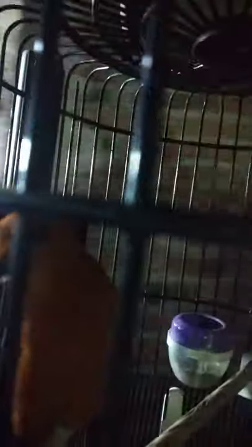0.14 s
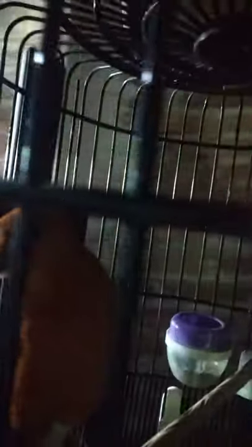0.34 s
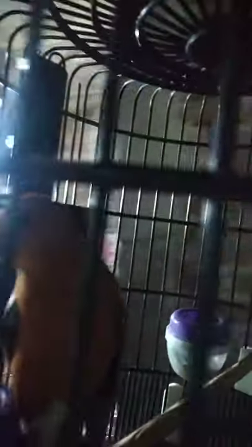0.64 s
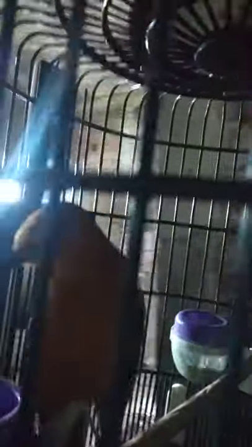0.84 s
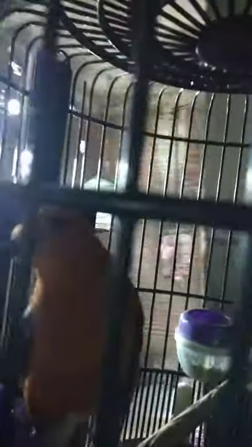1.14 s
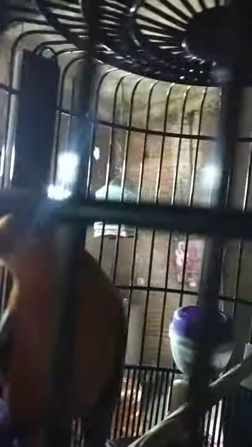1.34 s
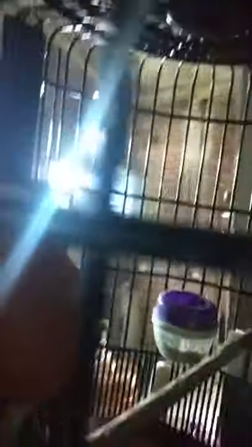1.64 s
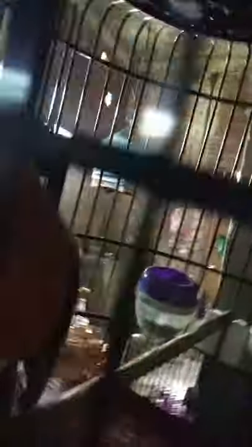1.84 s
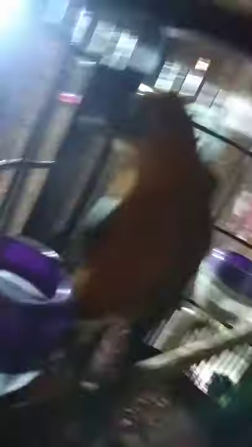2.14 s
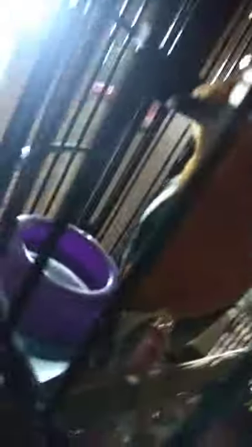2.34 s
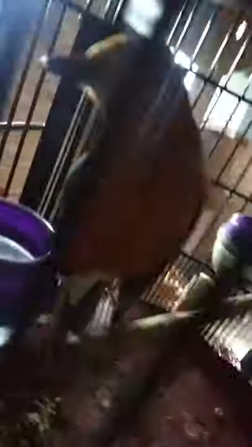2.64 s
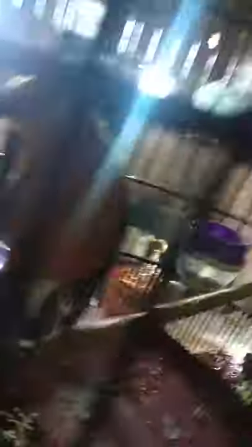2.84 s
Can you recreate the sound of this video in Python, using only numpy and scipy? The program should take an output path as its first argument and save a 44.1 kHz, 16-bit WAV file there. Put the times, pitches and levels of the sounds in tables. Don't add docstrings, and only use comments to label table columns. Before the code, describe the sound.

Short high chips from one bird repeat, a distant bird whistles faintly, then a near caged songbird warbles and glides downward; fingers tick and bump the phone casing amid room hum and microphone hiss.

```python
import sys
import numpy as np
from scipy import signal
from scipy.fft import rfft, irfft
from scipy.io import wavfile
from scipy.ndimage import uniform_filter1d

SR = 44100
rng = np.random.default_rng(int(sys.argv[2]) if len(sys.argv) > 2 else 0)


def waveform_to_disk(signal):
    frames = np.transpose(np.atleast_2d(signal))
    scaled = np.clip(frames, -1, 1) * 32767
    samples = np.round(scaled).astype(np.int16)
    wavfile.write(sys.argv[1], SR, samples)


def field_ratio(decibels):
    return 10 ** (np.asarray(decibels, dtype=float) / 20)


N = 132300
LEAD_IN = SR // 2


def evened(x):
    return x / np.sqrt(np.mean(x ** 2) + 1e-20)


def read(points, hz):
    f, value = np.transpose(points)
    return np.interp(np.log(hz + 1), np.log(f + 1), value)


def wander(shape, size):
    return evened(uniform_filter1d(rng.standard_normal(shape), size=size))


def add(mix, s, sound, pan_db, lag):
    for side, sign in enumerate((1, -1)):
        part = mix[side, LEAD_IN + round(s * SR) + sign * lag // 2:][:len(sound)]
        part += field_ratio(sign * pan_db / 2) * sound[:len(part)]


def coloured(shape, points):
    z = rfft(rng.standard_normal(shape))
    gain = field_ratio(read(points, np.fft.rfftfreq(shape[-1], 1 / SR)))
    return evened(irfft(z * gain, shape[-1]))


def tone_bump(hz, db, width):
    t = np.arange(-.03, .03, 1 / SR) if width < .01 else np.arange(-.04, .04, 1 / SR)
    return t[0], field_ratio(db) * np.exp(-(t / width) ** 2) * np.sin(2 * np.pi * hz * t)


def whistle(rows, overtones_db, breath_db):
    # start and end in seconds, depth in Hz.
    trills = [
        (1.05, 1.19, 230),
        (1.455, 1.6, 75),
        (1.64, 1.79, 80),
        (2.96, 3.1, 150),
    ]
    overtone_levels = [-32, -26.5, -22, -21.5, -30]
    # frequency in Hz, gain in dB.
    overtone_colour = [(4000, 9), (6000, -23.5), (8000, -13), (10500, -2), (13000, -13.5), (16000, -38)]
    # frequency in Hz, level in dB per Hz.
    breath_colour = [(3000, -13), (4300, 6), (5500, 6.5), (7000, 7), (11000, 0.5), (13500, -6),
                     (16000, -20)]
    waver, waver_hz = .005, 60
    trill_hz, trill_jitter = 137.2, 0.4
    fuzz, fuzz_hz = .5, 130

    s, hz, db = np.transpose(rows)
    t = np.arange(s.min(), s.max(), 1 / SR)
    drift = wander(30000, int(SR / waver_hz))[:len(t)]
    f = uniform_filter1d(np.interp(t, s, hz), 400, mode="nearest") * (1 + waver * drift)
    depth_hz = sum(depth * (t > start) * (t < end) for start, end, depth in trills)
    depth_hz = uniform_filter1d(depth_hz, 800, mode="nearest")
    f = f + depth_hz * np.sin(2 * np.pi * np.cumsum(trill_hz * (1 + trill_jitter * drift)) / SR)
    turn = 2 * np.pi * np.cumsum(f) / SR

    a, b = wander((2, 5, 30000), int(SR / fuzz_hz))[..., :len(t)]
    tone = np.sin(turn)
    for k, overtone_db in enumerate(overtone_levels, start=2):
        level = field_ratio(overtone_db + overtones_db + read(overtone_colour, k * f)) * (k * f < 17000)
        steady = ((1 - fuzz) + fuzz * a[k - 2]) * np.sin(k * turn)
        tone = tone + level * (steady + fuzz * b[k - 2] * np.cos(k * turn))
    breath = coloured((30000,), breath_colour)[:len(t)] * (0.21 + depth_hz / 150) * (1 + .8 * a[0])
    ends = np.clip(np.minimum(t - t[0], t[-1] - t) / .004, 0, 1)
    effort = field_ratio(uniform_filter1d(np.interp(t, s, db), 200, mode="nearest"))
    return ends * effort * (np.sqrt(2) * tone + field_ratio(breath_db) * breath)


def singer():
    # time in seconds, pitch in Hz, level in dB.
    warble = [
        [(1.052, 2226, -51), (1.066, 2377, -44.5), (1.1, 2545, -35.5), (1.135, 3288, -32.5), (1.165, 3122, -32),
         (1.21, 2623, -24.5), (1.25, 2581, -32.5), (1.35, 2538, -34.5), (1.43, 2648, -51)],
        [(1.455, 2552, -39), (1.485, 2448, -33.5), (1.525, 2288, -36.5), (1.56, 2016, -46.5),
         (1.585, 1950, -58)],
        [(1.65, 2363, -30.5), (1.67, 2528, -40), (1.695, 2360, -35.5), (1.725, 2074, -37.5), (1.77, 2016, -44),
         (1.795, 2452, -32), (1.835, 2476, -31.5), (1.865, 2407, -47.5), (1.88, 2354, -45.5)],
    ]
    # time in seconds, pitch in Hz, level in dB.
    whistles = [
        [(2.0, 5160, -117), (2.02, 5156, -32.5), (2.048, 4790, -33), (2.075, 4325, -27.5), (2.105, 4283, -36.5),
         (2.18, 4108, -29), (2.25, 3960, -36), (2.31, 3800, -69), (2.335, 3610, -56)],
        [(2.34, 3520, -77), (2.362, 3465, -30), (2.384, 3245, -29), (2.44, 3182, -33.5), (2.48, 3136, -46),
         (2.495, 3180, -71)],
        [(2.52, 3450, -70), (2.53, 3278, -22.5), (2.56, 3257, -33.5), (2.6, 3187, -29), (2.64, 3143, -36.5),
         (2.66, 3390, -82)],
        [(2.706, 2218, -48), (2.726, 2330, -39), (2.775, 2300, -40), (2.815, 2310, -28), (2.84, 2314, -24),
         (2.87, 2300, -45), (2.89, 2300, -66)],
        [(2.96, 2800, -53), (2.98, 3058, -35), (3.02, 3330, -16)],
    ]
    # overtones in dB, breath noise in dB, left over right in dB.
    voice = [(4, -20, 0), (9, -47, 0), (10, -47, 1), (26.5, -19.5, 0), (3, -18, -1.5), (0.5, -20.5, 2.5),
             (-2, -20.5, 6), (-8, -55, 1.5)]
    song = np.zeros((2, N + LEAD_IN))
    for rows, (overtones_db, breath_db, pan_db) in zip(warble + whistles, voice):
        add(song, rows[0][0], whistle(rows, overtones_db, breath_db), pan_db, lag=7)
    return song


def chip(db, dip_hz, end_hz, end_db):
    top_hz, lead_db = 6250, -30
    lead_s, fall_s, dip_s, rise_s, end_s, stop_s = .004, .005, .003, .003, .012, .003
    at = np.cumsum([0, lead_s, fall_s, dip_s, rise_s, end_s, stop_s])
    t = np.arange(0, at[-1], 1 / SR)
    wobble = wander(4000, 120)[:len(t)]
    f = np.interp(t, at, [top_hz, top_hz, dip_hz, dip_hz, end_hz, end_hz, end_hz]) * (1 + .012 * wobble)
    level = field_ratio(db + np.interp(t, at, [lead_db, lead_db + 16.5, 0, 0, end_db, end_db, -40]))
    rasp = wander(4000, 40)[:len(t)]
    level = level * (1 + .03 * rasp)
    snap = rng.standard_normal(4000)[:len(t)] * np.exp(-((t - at[3]) / 0.0019) ** 2)
    tone = np.sin(2 * np.pi * np.cumsum(f) / SR)
    return level * np.minimum(t / 0.00067, 1) * (tone + field_ratio(-24) * snap)


def chipping_bird():
    # start in seconds, level in dB, dip in Hz, end pitch in Hz, end level in dB.
    chip_rows = [(-.17, -30, 5350, 6010, -5), (0.226, -21.5, 5335, 5950, -5.5),
                 (0.676, -26, 5516, 6067, 0.5), (1.071, -27.5, 5283, 6055, 0),
                 (1.466, -28.5, 5530, 6077, 1), (1.851, -26.5, 5566, 6100, -5),
                 (2.249, -30, 5600, 6140, 1.5), (2.571, -28, 5590, 6150, -3.5),
                 (2.835, -30, 5845, 6195, -4)]
    # time in seconds, left over right in dB.
    phone_turn = [(1.1, 3.5), (1.5, 0.5), (2.9, -5)]
    # middle in seconds, pitch in Hz, level in dB, width in seconds.
    pip_s, pip_hz, pip_db, pip_width = (.826, 1550, -56, .005)
    chips = np.zeros((2, N + LEAD_IN))
    for s, *shape in chip_rows:
        add(chips, s, chip(*shape), np.interp(s, *np.transpose(phone_turn)), lag=-3)
    lead, sound = tone_bump(pip_hz, pip_db, pip_width)
    add(chips, pip_s + lead, sound, 0.3, 0)
    return chips


def far_bird():
    # time in seconds, pitch in Hz, level in dB.
    far_rise = [(.495, 2300, -66), (.57, 2800, -56), (.61, 3110, -51), (.63, 3150, -48), (.668, 3160, -52),
                (.685, 3250, -68), (.71, 3350, -58), (.74, 3450, -70)]
    # time in seconds, pitch in Hz, level in dB.
    far_fall = [(1.555, 3350, -68), (1.575, 3300, -60), (1.6, 3260, -61), (1.625, 3180, -70)]
    far = np.zeros((2, N + LEAD_IN))
    add(far, far_rise[0][0], whistle(far_rise, -24, -40), 0.3, 0)
    add(far, far_fall[0][0], whistle(far_fall, -15, -34), 0.3, 0)
    return far


def room(x, shorten):
    # frequency in Hz, time to fall by 60 dB in seconds.
    decay = [(2500, 0.29), (6000, 0.54), (10000, 0.31)]
    first_echo_s, shared, drift_hz = 0.0056, 0.067, 1.8
    at = np.arange(round(first_echo_s * SR), SR - 40, 20)
    at = at + rng.integers(0, 20, (3, 3, len(at)))
    taps = np.zeros((3, 3, SR))
    np.put_along_axis(taps, at, rng.choice([-1., 1.], at.shape), 2)
    pair = shared * taps[:, 2:] + np.sqrt(1 - shared ** 2) * taps[:, :2]
    hz, t, z = signal.stft(pair, SR, nperseg=256)
    t60 = shorten * read(decay, hz)[:, None]
    tail = signal.istft(z * field_ratio(-60 * t / t60) / np.sqrt(t60), SR, nperseg=256)[1]
    tail = tail / np.linalg.norm(tail[0, 0])
    wet = signal.fftconvolve(x[None], tail, axes=2)[..., :x.shape[1]]
    turn = 2 * np.pi * (drift_hz * np.arange(x.shape[1]) / SR + np.arange(3)[:, None, None] / 3)
    return (np.sqrt(2 / 3) * np.cos(turn) * wet).sum(0)


def birds():
    song, chips, far = singer(), chipping_bird(), far_bird()
    song_wet = room(field_ratio(6.5) * song + far, shorten=0.8)
    chips_wet = room(field_ratio(2) * chips, shorten=1)
    return field_ratio(-6) * song + field_ratio(3) * chips + .5 * far + song_wet + chips_wet


def ticks(out):
    tick_starts = [
        1.95666,
        2.0148,
        2.9985,
    ]
    # peak in dB, ring in Hz, time to fall by 60 dB in seconds, left over right in dB.
    tick_rows = [(-2.5, 8700, .0013, 11), (-37, 10500, .003, 1.5), (-32, 8000, .003, 3)]
    t = np.arange(400) / SR
    for s, (db, hz, t60, pan_db) in zip(tick_starts, tick_rows):
        ring = field_ratio(-60 * t / t60) * np.sin(2 * np.pi * hz * t) * np.minimum(t / .00006, 1)
        edge = field_ratio(-13) * np.exp(-((t - .00009) / .00002) ** 2)
        add(out, s, field_ratio(db) * (edge - ring), pan_db, lag=-28)


def bumps(out):
    bump_starts = [2.2672, 2.2595, 2.362, 1.705]
    # peak in dB, width in seconds, crackle in dB, left over right in dB.
    bump_rows = [
        (-33.5, 0.0009, -8, -30),
        (-47, 0.0036, 3, -20),
        (-33, 0.001, -8, 10.5),
        (-50, 0.0003, -20, 20),
    ]
    t = np.arange(-400, 1200) / SR
    for s, (db, width, crackle_db, pan_db) in zip(bump_starts, bump_rows):
        u = t / width
        push = np.exp(-u ** 2) - 0.55 * np.exp(-((u - 3) / 3.43) ** 2)
        crackle = uniform_filter1d(rng.standard_normal(len(t)), size=10) * np.exp(-(t / 0.0021) ** 2)
        add(out, s + t[0], field_ratio(db) * (push + field_ratio(crackle_db) * crackle), pan_db, 0)


def scuffs(out):
    # middle in seconds, pitch in Hz, level in dB, width in seconds.
    scuff_rows = [
        (.41, 1150, -62, .004),
        (.413, 1900, -63, .004),
        (.447, 1250, -60, .004),
        (.45, 1800, -63, .005),
        (.33, 620, -60, .015),
        (2.785, 100, -46, .012),
    ]
    t = np.arange(-.04, .04, 1 / SR)
    for s, hz, db, width in scuff_rows:
        sound = field_ratio(db) * np.exp(-(t / width) ** 2) * np.sin(2 * np.pi * hz * t)
        add(out, s + t[0], sound, 3, 0)


def touches():
    out = np.zeros((2, N + LEAD_IN))
    ticks(out)
    scuffs(out)
    bumps(out)
    return out


def rustle():
    level = np.interp(np.arange(N) / SR, (2.045, 2.065, 2.17), [0, 1, 0])
    grain = rng.standard_normal((2, N)) * (rng.random((2, N)) < .01)
    dull = signal.butter(2, (380, 720), "band", fs=SR, output="sos")
    return field_ratio(-54) * level * evened(signal.sosfilt(dull, grain))


def bed(points, same, patch_db):
    frames, hz = N // 256 + 5, np.fft.rfftfreq(1024, 1 / SR)
    a, b, c, d, patches = rng.standard_normal((frames, 513, 5)).T
    patches = evened(uniform_filter1d(uniform_filter1d(patches, 14, 0), 12, 1))
    left = a + 1j * b
    right = same * left + np.sqrt(1 - same ** 2) * (c + 1j * d)
    z = np.array([left, right]) * field_ratio(read(points, hz)[:, None] + patch_db * patches)
    return evened(signal.istft(z, nperseg=1024, noverlap=768)[1][:, :N])


def room_hum():
    # frequency in Hz, level in dB per Hz.
    hum_colour = [(12, -41), (20, 7.5), (59, -8), (102, -12), (209, -14.5), (455, -28.5), (481, -24.5),
                  (1500, -63.5), (1950, -51), (3300, -120)]
    # time in seconds, rise of the hum in dB.
    handling = [
        (2.02, 10.5),
        (2.2, 12.5),
        (2.5, 7.5),
    ]
    stirred_db = np.interp(np.arange(N) / SR, *np.transpose(handling))
    return field_ratio(-60.5 + stirred_db) * bed(hum_colour, same=0.68, patch_db=1)


def hiss():
    # frequency in Hz, level in dB per Hz.
    hiss_colour = [(300, -2.5), (1200, -7), (3000, -9), (15500, -14)]
    return field_ratio(-57) * bed(hiss_colour, same=0.013, patch_db=5)


def whine():
    phase = np.cumsum(.01 * rng.standard_normal(N))
    return field_ratio(-74) * np.sin(2 * np.pi * 11693 * np.arange(N) / SR + phase)


def scene():
    near = (birds() + touches())[:, LEAD_IN:]
    return near + rustle() + room_hum() + hiss() + whine()


def masked(x):
    frame_lead, band_bins = 903, 11
    mask_db, up_slope, down_slope = 44, 2.2, 20
    hz, _, z = signal.stft(np.pad(x, ((0, 0), (frame_lead, 0))), SR, nperseg=2048)
    band = np.arange(len(hz)) // band_bins
    power = np.add.reduceat((abs(z) ** 2).mean(0), np.arange(0, len(hz), band_bins)) + 1e-20
    level, khz = 10 * np.log10(power), hz[::band_bins, None] / 1000
    wide = 10 * np.log10(3 * abs(uniform_filter1d(power, size=3, axis=0)) + 1e-20)
    wide = wide + 11 * (khz > 4.8)
    seen = np.where(khz > 1.5, wide, -200)
    up = np.maximum.accumulate(seen + up_slope * khz) - up_slope * khz
    down = np.maximum.accumulate((seen - down_slope * khz)[::-1])[::-1] + down_slope * khz
    air = np.where(khz > 12.5, seen.max(0) - 45, -200)
    scatter = 12 * uniform_filter1d(rng.standard_normal(level.shape), size=5)
    keep = level > np.maximum(np.maximum(up, down) - mask_db, air) + scatter
    keep &= (khz < 15.8) | (level > -74)
    return signal.istft(z * keep[band], SR, nperseg=2048)[1][:, frame_lead:frame_lead + N]


def top_cut(x):
    return signal.sosfilt(signal.butter(12, 16700, fs=SR, output="sos"), x)


def record(dry):
    edge = signal.firwin(255, 16600, window=("kaiser", 9), fs=SR)[None]
    mix = signal.oaconvolve(masked(dry), edge, "same")
    return top_cut(mix)


dry = scene()
out = record(dry)
waveform_to_disk(out)
```